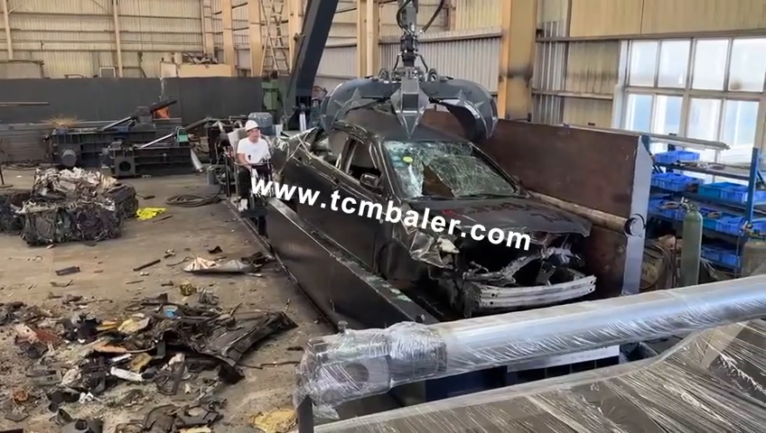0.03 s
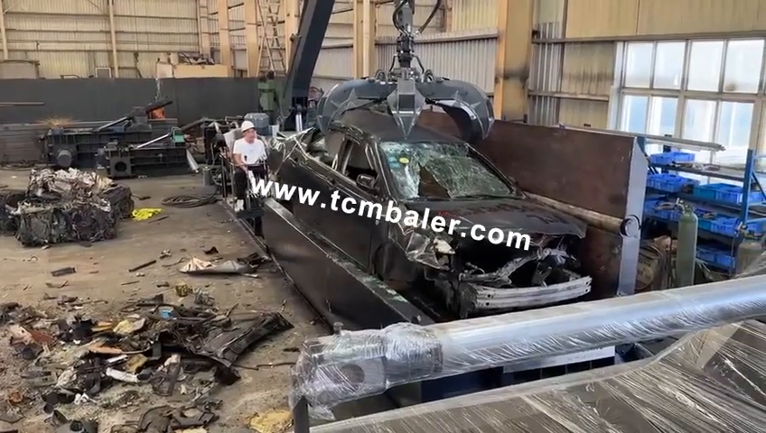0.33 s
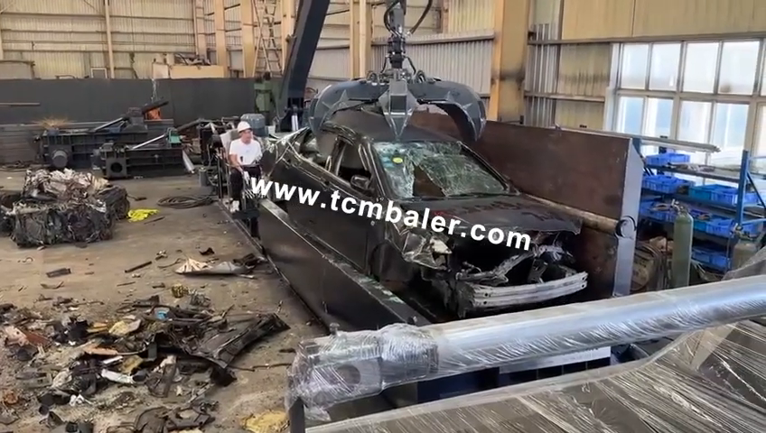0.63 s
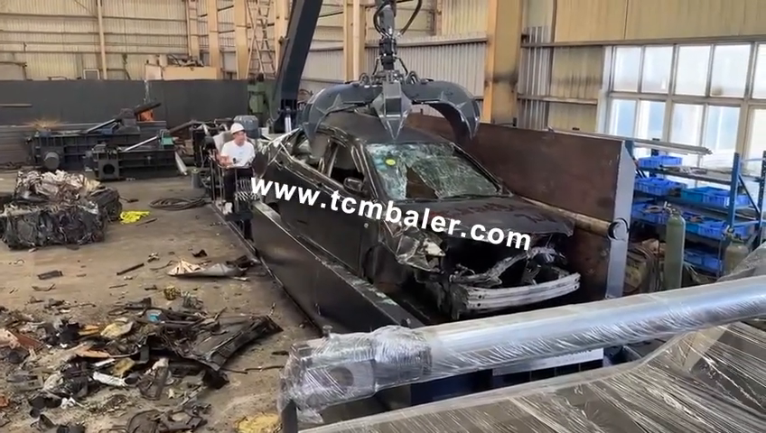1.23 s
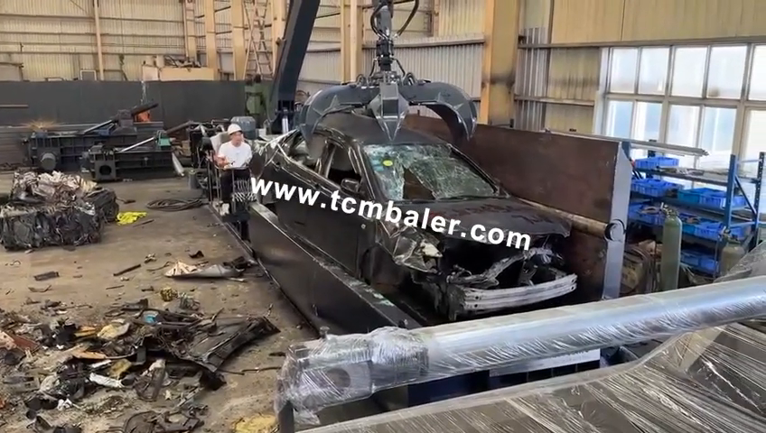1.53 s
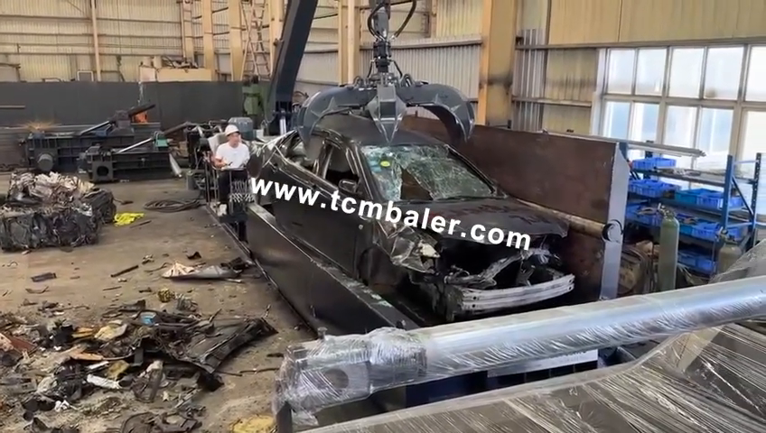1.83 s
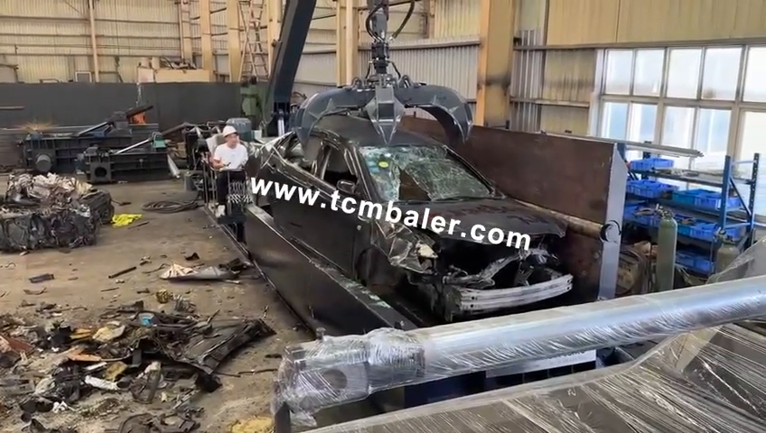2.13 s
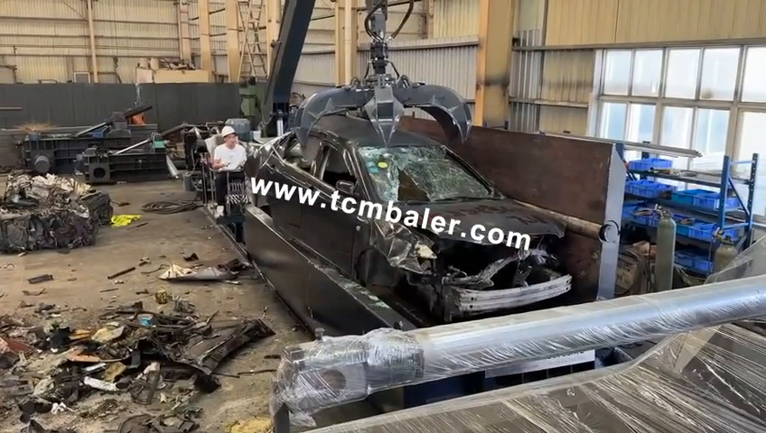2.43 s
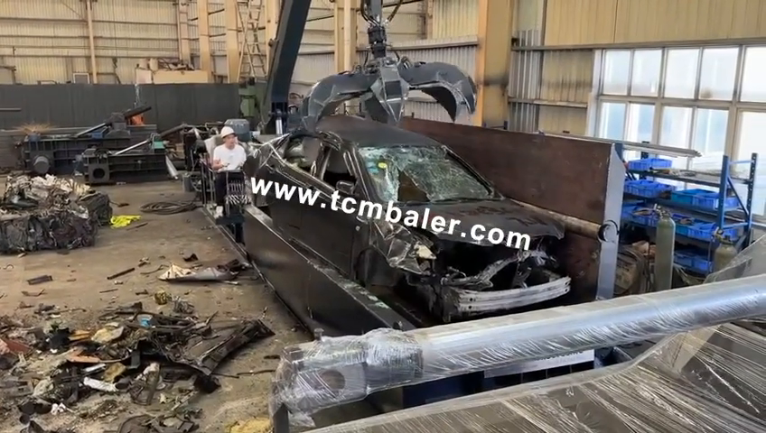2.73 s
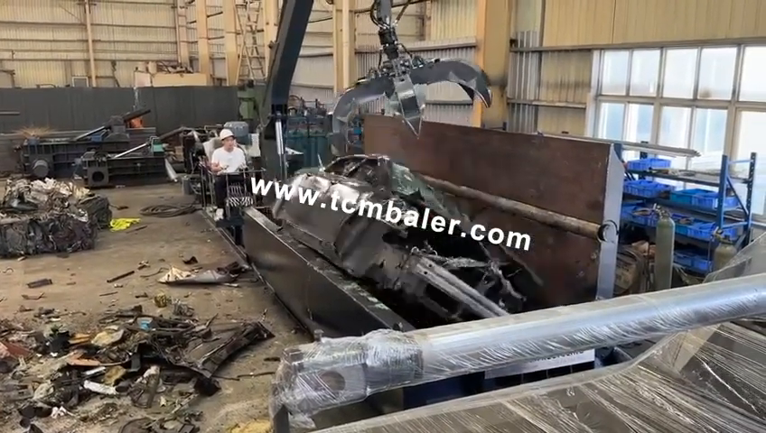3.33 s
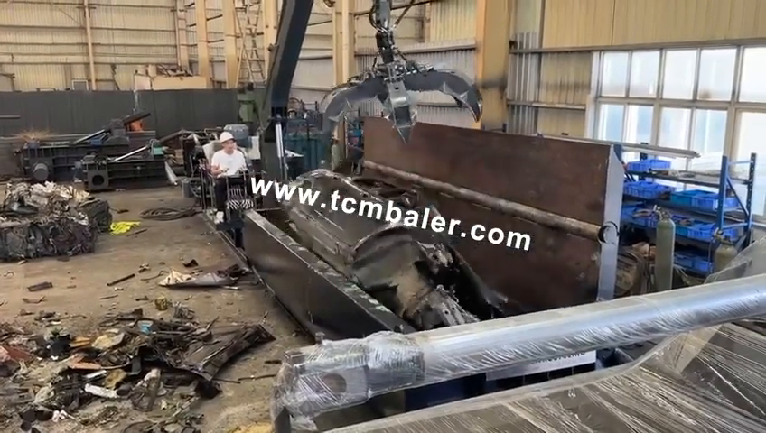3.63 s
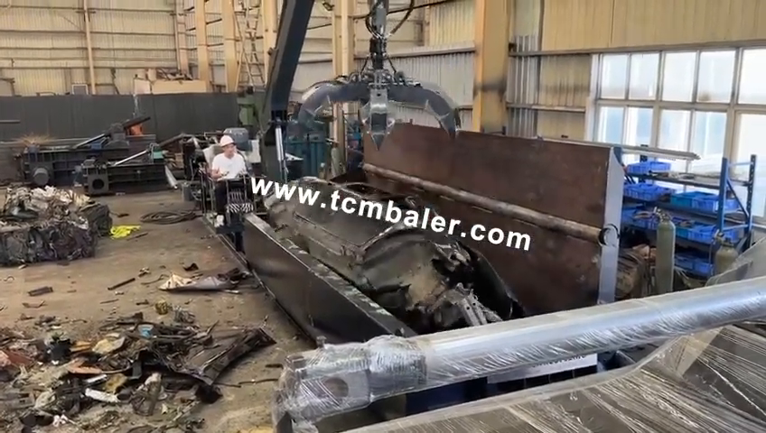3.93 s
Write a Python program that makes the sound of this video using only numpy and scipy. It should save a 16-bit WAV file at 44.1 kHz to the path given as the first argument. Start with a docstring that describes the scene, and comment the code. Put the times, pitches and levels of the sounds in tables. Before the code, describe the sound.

A car shell drops into a steel baler. First a diesel hydraulic pump drones with a thin whistle, slightly left. Then, straight ahead, grab claws snap and scrape, and the shell lands with crunches and hollow booms in a hall.

```python
"""A car shell drops into a baler

A diesel-driven hydraulic pump drones in a steel hall, with a thin valve whistle on top.
A grab lets go of a car shell: its claws snap and scrape over the buckling roof, and the shell
drops into the baler's steel box with hollow booms and a crunch of sheet metal."""
import sys
import numpy as np
from scipy import signal
from scipy.fft import rfft, irfft, next_fast_len
from scipy.io import wavfile
from scipy.ndimage import uniform_filter1d, map_coordinates

SR = 44100
rng = np.random.default_rng(int(sys.argv[2]) if len(sys.argv) > 2 else 0)


def store_pcm(level_fs):
    """Save levels as 16-bit WAV."""
    pcm = np.round(np.clip(level_fs, -1, 1) * 32767).astype(np.int16)
    wavfile.write(sys.argv[1], SR, np.atleast_2d(pcm).T)


N = 176400
T = np.arange(N) / SR


def amp(db):
    """Turn decibels into a gain."""
    return 10 ** (np.asarray(db) / 20)


def unit(x):
    """Scale a signal to an average (rms) level of 1."""
    return x / np.sqrt(np.mean(x ** 2) + 1e-20)


def along(table, hz):
    """Read between the rows of a (freq_hz, value) table, on a log frequency scale."""
    freqs, values = np.transpose(table)
    return np.interp(np.log(hz + 1), np.log(freqs + 1), values)


def wobble(rate):
    """A smooth random curve through `rate` new values a second."""
    knots = rng.standard_normal(2048)
    return np.interp(T, T[::32], map_coordinates(knots, [T[::32] * rate], mode="wrap"))


def filtered(x, response):
    """Scale each frequency of x by response(hz)."""
    size = next_fast_len(N + SR // 2)
    return irfft(rfft(x, size) * response(np.fft.rfftfreq(size, 1 / SR)), size)[..., :N]


def burst(start_s, rise_s, fade_s, hold_s=0):
    """A loudness curve that rises, holds, then falls 60 dB in fade_s."""
    age = np.maximum(T - start_s, 0)
    return (1 - np.exp(-age / rise_s)) * amp(-60 * np.maximum(age - hold_s, 0) / fade_s)


# How alike left and right sound: freq_hz, likeness (0 to 1)
STEREO_LIKENESS = [(60, .99), (130, .975), (260, .88), (600, .74), (1500, .64), (4000, .54), (9000, .7),
                   (15000, .68)]
def spread(pair, colour):
    """Shape two unrelated signals by a tone colour into stereo of level 1, near mono in the bass."""
    def response(hz):
        angle = np.arccos(np.clip(along(STEREO_LIKENESS, hz), -1, 1)) / 2
        return amp(along(colour, hz)) * [np.cos(angle), np.sin(angle)]
    mid, side = filtered(pair, response)
    return unit(np.array([mid + side, mid - side]))


def noise(colour):
    """Stereo noise of level 1 with the given tone colour."""
    return spread(rng.standard_normal((2, N)), colour)


# How long the hall echoes: freq_hz, fade_s
HALL_FADES = [(100, 0.13), (1000, 0.25), (4000, 0.93), (12000, 0.21)]
def hall(x):
    """The hall's echo, each frequency dying away at its own speed."""
    hz, t, spectrum = signal.stft(rng.standard_normal((2, SR)), SR, nperseg=256)
    fade = amp(-60 * t / along(HALL_FADES, hz)[:, None])
    tail = signal.istft(spectrum * fade, SR, nperseg=256)[1]
    return signal.fftconvolve(x, tail / np.linalg.norm(tail[0]), axes=1)[:, :N]


CYCLE_HZ = 12.505  # four-stroke engine cycles a second
def throb(depth):
    """A gain that pulses in step with the engine's crank."""
    angle = 2 * np.pi * CYCLE_HZ * T
    return 1 + depth * (np.sin(3 * angle) + .7 * np.sin(2 * angle) + .6 * np.sin(6 * angle))


# Tone colours of the machine noise and the hall's rumble: freq_hz, gain_db
DIN_COLOUR = [(100, -16), (170, -1.5), (235, -4.5), (440, -5.5), (510, -11.5), (700, -7.5), (950, -9.5),
              (1250, -11), (2200, -14.5), (3000, -18.5), (5000, -21), (7000, -22.5), (9400, -34),
              (11000, -30.5), (13500, -33.5), (15500, -40)]
RUMBLE_COLOUR = [(25, -37), (42, -21), (56, 15), (90, 13.5), (130, 11), (190, -3), (300, -48)]
def din():
    """Broad machine noise that throbs with the engine, over the hall's rumble."""
    level_db = -25 + .3 * wobble(10)
    return amp(level_db) * throb(depth=.056) * noise(DIN_COLOUR) + amp(-33.5) * noise(RUMBLE_COLOUR)


# The engine's firing tones: multiple (of CYCLE_HZ), level_db
FIRING_TONES = [(6, -27), (9, -26), (10, -31.5), (11, -44.5), (12, -32.5), (16, -40.5), (24, -40.5)]
# Outline of its higher overtones: freq_hz, level_db
OVERTONES = [(220, -46.5), (310, -45.5), (440, -46), (540, -51.5), (720, -51), (950, -53.5), (1250, -54),
             (2000, -57.5), (2500, -62)]
def engine():
    """The diesel's firing makes strong low tones and a buzz of overtones that repeats every cycle."""
    firing_s = .076  # moment of one strong firing
    cycles = CYCLE_HZ * (T - firing_s) + .0006 * wobble(4.06)
    low = sum(amp(db + .4 * wobble(4.77)) * np.sin(2 * np.pi * multiple * cycles)
              for multiple, db in FIRING_TONES)
    multiples = np.arange(17, 200)
    count = len(multiples)
    sizes = amp(along(OVERTONES, multiples * CYCLE_HZ) + 2.5 * rng.standard_normal(count))
    phases = 2 * np.pi * rng.random(count) + .45 * rng.standard_normal((2, count))  # left, right
    one_cycle = np.arange(4096) / 4096
    waves = sizes[:, None] * np.sin(2 * np.pi * multiples[:, None] * one_cycle + phases[..., None])
    buzz = np.array([np.interp(cycles, one_cycle, side, period=1) for side in waves.sum(axis=1)])
    return np.sqrt(2) * (low + buzz)


# The pump's piston and gear tones: pitch_hz, level_db
PUMP_TONES = [(192.6, -34), (450.3, -32.5), (576, -40.5), (673.6, -36), (726, -39.5), (898.7, -41.5),
              (1049.5, -38.5), (1213, -48), (1292, -42), (1738, -41.5), (2390, -42)]
def pump():
    """Piston and gear tones drift with the shaft's speed and waver on their way through the hall."""
    out = np.zeros((2, N))
    shaft_s = T + .00051 * np.cumsum(wobble(5.94)) / SR
    for hz, db in PUMP_TONES:
        rate = 3 + hz / 120
        scatter = np.array([wobble(rate) + 1j * wobble(rate) for _ in range(3)])  # both, left, right
        waver = 1 + .17 * (scatter[0] + .9 * scatter[1:])
        tone = np.exp(2j * np.pi * (hz * shaft_s + rng.random()))
        out += amp(db) * np.real(waver * tone)
    return out


# How the whistle swells and sinks: time_s, level_db
WHISTLE_SWELL = [(0, -34), (1.5, -32.5), (1.9, -33), (2.6, -31.5), (3.15, -31), (3.35, -35.5), (4, -37)]
# Tone colour of its hiss: freq_hz, gain_db
WHISTLE_COLOUR = [(7000, -29.5), (7800, 1.5), (8250, -12), (8660, 1.5), (8800, 6.5), (8930, 14),
                  (9090, -8.5), (9550, -5), (10500, -58)]
def valve():
    """Oil rushing through a valve makes a narrow, fluttering hiss around a thin tone."""
    pitch_hz, flutter_db = 8841, 1.8
    level_db = np.interp(T, *np.transpose(WHISTLE_SWELL)) + flutter_db * unit(wobble(14) + wobble(63))
    tone = np.sqrt(2) * np.sin(2 * np.pi * pitch_hz * T + .15 * wobble(3.55))
    return amp(level_db) * throb(depth=.017) * (noise(WHISTLE_COLOUR) + amp(-12) * tone)


# How much louder the machine is on the left: freq_hz, difference_db
LEFT_LOUDER = [(40, -0.2), (120, 2), (250, 2), (500, 3.5), (1000, 1.4), (2000, 3.5), (4000, 5), (8000, 2.5),
               (15000, -2.5)]
# How far its waves are ahead on the left: freq_hz, lead_radians
LEFT_AHEAD = [(60, 0), (430, .04), (1400, .1), (3200, 1.1), (5200, .9), (8800, 0), (12000, .3)]
def to_the_left(hz):
    """Left and right filter gains that place the machine a little to the left."""
    share = np.array([[.5], [-.5]])
    return amp(along(LEFT_LOUDER, hz)) ** share * np.exp(1j * along(LEFT_AHEAD, hz) * share)


# The heavy shell shifting and landing: start_s, level_db
FLOOR_BOOMS = [(0.698, -18), (2.11, -27), (2.26, -21), (2.67, -31), (2.77, -29), (3.031, -20), (3.251, -29),
               (3.369, -18), (3.479, -13), (3.575, -15), (3.761, -27), (3.97, -16)]
def booms():
    """The floor of the steel box swings with a deep note under the shifting weight."""
    out = np.zeros(N)
    for start, db in FLOOR_BOOMS:
        pitch_hz = 55.7 * (1 + rng.normal(0, .04))
        tone = np.sqrt(2) * np.sin(2 * np.pi * pitch_hz * (T - start))
        out += amp(db) * burst(start, rise_s=.024, fade_s=.51) * tone
    return out


# Notes the body panels ring at: pitch_hz, width_hz, gain_db
PANEL_NOTES = [(455, 12, -2), (523, 65, -6.5), (733, 150, -1), (1175, 70, -2.5), (1326, 27, 5),
               (1406, 68, -7), (1610, 31, -1), (1860, 210, -7), (2730, 17, -14), (3870, 410, -8.5),
               (4980, 300, -3)]
def sheet_metal(force, colour):
    """Many tiny slips and a smooth friction hiss, as strong as the force, ring the body panels."""
    def ringing(hz):
        return 1 + amp(9) * sum(amp(db) * 1j * hz * width / (pitch ** 2 - hz ** 2 + 1j * hz * width)
                                for pitch, width, db in PANEL_NOTES)
    slips_per_s = 2600
    slips = unit((rng.random(N) < slips_per_s / SR) * rng.standard_normal((2, N)))
    hiss = .38 * rng.standard_normal((2, N))
    panels = filtered((slips + hiss) * force, ringing)
    return spread(panels, colour) * np.sqrt(np.mean(force ** 2))


# Sharp snaps of metal under the claws: start_s, level_db
CLAW_SNAPS = [(0.638, -15), (1.9566, -34), (3.0555, -10.5), (3.081, -13), (3.087, -17), (3.109, -8),
              (3.1382, -15), (3.154, -17), (3.178, -20), (3.206, -19)]
# Roof and sides scraping, and panels groaning under load: start_s, length_s, level_db
BODY_SCRAPES = [(0.645, 0.018, -25), (2.682, 0.11, -26.5), (2.968, 0.12, -22.5), (3.071, 0.047, -22),
                (3.124, 0.11, -16), (3.27, 0.142, -24), (3.819, 0.025, -20.5)]
PANEL_GROANS = [(0.738, 0.33, -33), (2.98, 0.061, -22), (3.162, 0.019, -18)]
# Tone colours of these three sounds: freq_hz, gain_db
SNAP_TONE = [(200, -16), (700, 13.5), (2000, 5), (5000, 5), (7000, -1), (9500, 11.5), (12000, 1.5),
             (15500, 3)]
SCRAPE_TONE = [(120, 7), (300, 9.5), (750, 0), (1350, -4.5), (2600, -2), (4300, -8.5), (5500, -12.5),
               (7000, -11.5), (10000, -12), (12000, -12), (15000, -34)]
GROAN_TONE = [(300, -23), (440, -8), (560, -8), (740, 0.5), (900, -14), (1100, -5), (1330, -14),
              (1700, -11), (2400, -39)]
def claws():
    """The claws snap over edges; the shell scrapes on steel and its roof groans."""
    snaps = sum(amp(db) * burst(start, rise_s=.00033, fade_s=.026) for start, db in CLAW_SNAPS)
    drag = sum(amp(db) * burst(start, rise_s=.005, fade_s=.059, hold_s=length)
               for start, length, db in BODY_SCRAPES)
    strain = sum(amp(db) * burst(start, rise_s=.0099, fade_s=.18, hold_s=length)
                 for start, length, db in PANEL_GROANS)
    return snaps * noise(SNAP_TONE) + sheet_metal(drag, SCRAPE_TONE) + sheet_metal(strain, GROAN_TONE)


# Panels giving way: start_s, level_db, pitch_hz
DENTS = [(0.639, -27.5, 1410), (3.109, -20, 1937), (3.139, -20, 1222), (3.154, -18, 1856),
         (3.1767, -14, 1394), (3.191, -24, 1288), (3.2066, -11.5, 1295), (3.2126, -24, 1290),
         (3.226, -26, 1460), (3.5267, -17.5, 1280), (3.539, -16, 796), (3.5796, -19, 1198),
         (3.645, -31, 1600), (3.681, -28, 1410), (3.7862, -25.5, 1286), (3.8186, -24, 1540)]
# Tone colour of the crack: freq_hz, gain_db
CRACK_TONE = [(250, -14), (700, 0), (1400, 3.5), (2100, -1), (3000, -6), (4200, -3), (5400, -3),
              (6600, -19), (10000, -20), (15000, -40)]
# Notes in a dent's ring: multiple (of its pitch), gain_db
DENT_NOTES = [(1, 0), (1.14, -7), (3.5, -11)]
def buckles():
    """A panel gives way with a hard crack and rings briefly, its pitch sagging as the dent spreads."""
    rise_s, sag_per_s = .0004, .2
    cracks = sum(amp(db) * burst(start, rise_s, fade_s=.035, hold_s=.004) for start, db, _ in DENTS)
    out = cracks * noise(CRACK_TONE)
    for start, db, hz in DENTS:
        age = T - start
        cycles = hz * age * (1 - sag_per_s * age / 2)
        ring = sum(amp(gain_db) * np.sin(2 * np.pi * (multiple * cycles + rng.random()))
                   for multiple, gain_db in DENT_NOTES)
        out += amp(db) * burst(start, rise_s, fade_s=.13) * ring
    return out


BLOW_RISE_S = .0031
# Hollow notes of the whole shell: pitch_hz, gain_db, fade_s
SHELL_NOTES = [(154, -2, .25), (198, -4, .2), (230.5, -1, .17), (309.6, -2, .26), (477, -4, .26)]
def shell_ring(start, db, centre_hz):
    """One blow rings the hollow shell; where it lands favours the notes near centre_hz."""
    out = np.zeros(N)
    for hz, gain_db, fade_s in SHELL_NOTES:
        octaves_away = abs(np.log2(hz / centre_hz))
        level_db = db + gain_db - 12 * octaves_away + rng.normal(0, 1)
        tone = np.sin(2 * np.pi * hz * (1 + rng.normal(0, .023)) * (T - start))
        out += amp(level_db) * burst(start, BLOW_RISE_S, fade_s) * tone
    return out


# The shell hitting the box: start_s, thud_db, crunch_db, centre_hz
SHELL_BLOWS = [(3.43, -12, -25, 310), (3.444, -11.5, -27, 310), (3.503, -11.5, -23, 190),
               (3.523, -15, -19, 310), (3.534, -5.5, -26, 230), (3.574, -15, -25.5, 300),
               (3.631, -22, -25, 170), (3.67, -22, -27, 400), (3.922, -16, -30, 400),
               (3.974, -14.5, -24.5, 270)]
# Tone colours of the thud and the crunch: freq_hz, gain_db
THUD_TONE = [(70, -18), (150, -2), (220, -3.5), (330, -6), (480, -9.5), (900, -11.5), (2000, -73)]
CRUNCH_TONE = [(200, -1), (500, 2), (850, 5.5), (1400, 1.5), (2600, 3), (5000, -12.5), (7500, -7.5),
               (10000, -8.5), (15000, -24)]
def landing():
    """Each blow against the box thuds in the hollow shell and crumples its panels."""
    ring = sum(shell_ring(start, db, hz) for start, db, _, hz in SHELL_BLOWS)
    thud = sum(amp(db) * burst(start, BLOW_RISE_S, fade_s=.46) for start, db, _, _ in SHELL_BLOWS)
    crunch = sum(amp(db) * burst(start, BLOW_RISE_S, fade_s=.48) for start, _, db, _ in SHELL_BLOWS)
    return amp(1.5) * ring + amp(-8) * thud * noise(THUD_TONE) + sheet_metal(crunch, CRUNCH_TONE)


def scene():
    """The machine drones a little to the left; the car, straight ahead, echoes in the hall."""
    machine = filtered(engine() + pump() + din() + valve(), to_the_left)
    car = (claws() + buckles() + landing()) * amp([[.16], [-.16]])
    return machine + car + amp(-9) * hall(car) + booms()


def gain_control(x):
    """Loud sound turns the volume down quickly; it creeps back slowly."""
    threshold_db, share_removed, recovery_db_per_s = -14, .5, 13.5
    power = uniform_filter1d(np.mean(x ** 2, axis=0), size=1500)
    excess_db = np.maximum(10 * np.log10(abs(power) + 1e-9) - threshold_db, 0)
    recovery_db = recovery_db_per_s * T
    cut_db = np.maximum.accumulate(share_removed * excess_db + recovery_db) - recovery_db
    return x * amp(-cut_db)


def record(dry):
    """Turn down loud moments, round off the peaks and cut the highest treble."""
    held = gain_control(dry)
    rounded = held / (1 + abs(held / .85) ** 6) ** (1 / 6)
    return filtered(rounded, lambda hz: hz < 15750)


dry = scene()
out = record(dry)
store_pcm(out)
```